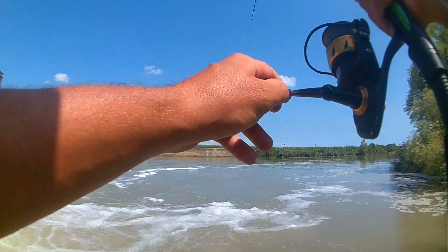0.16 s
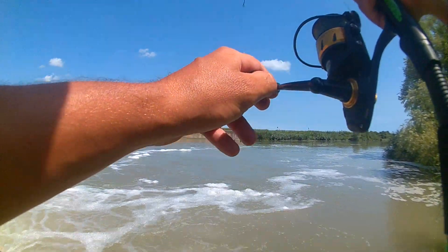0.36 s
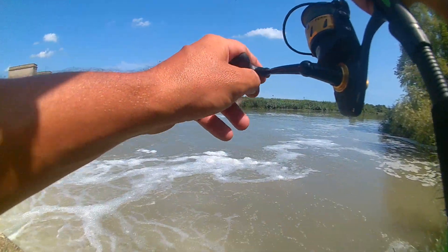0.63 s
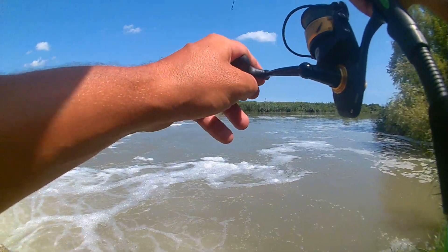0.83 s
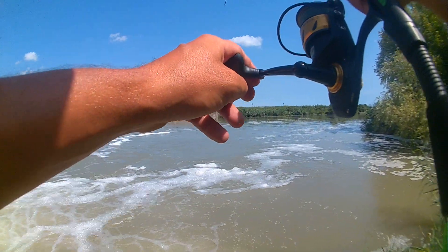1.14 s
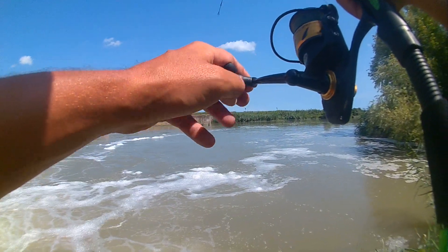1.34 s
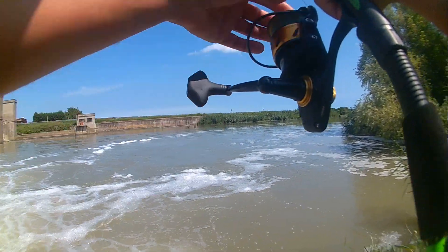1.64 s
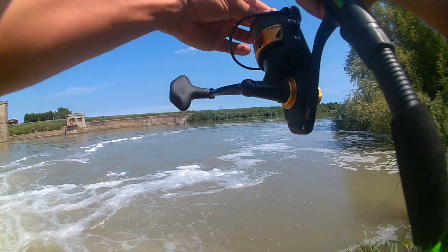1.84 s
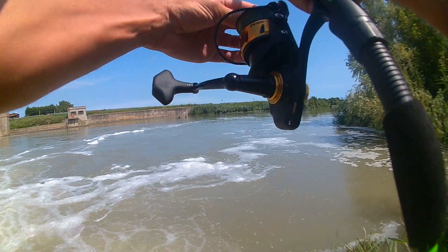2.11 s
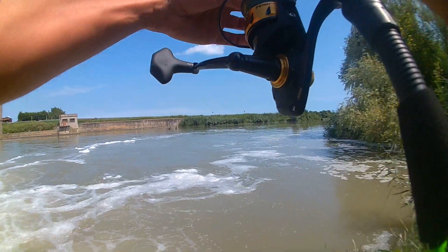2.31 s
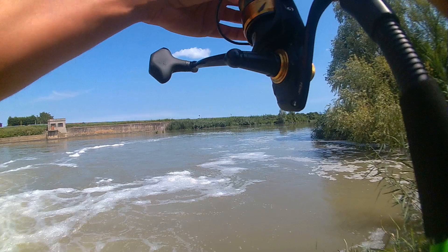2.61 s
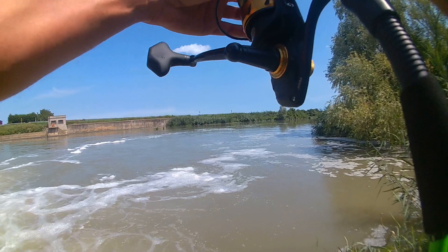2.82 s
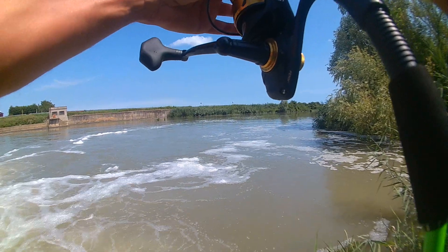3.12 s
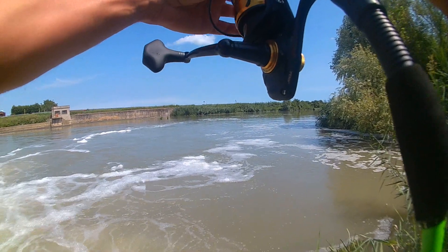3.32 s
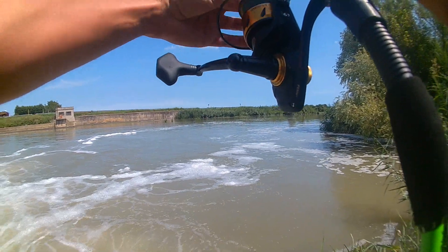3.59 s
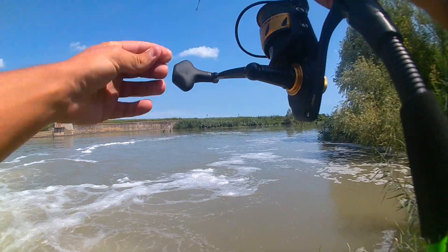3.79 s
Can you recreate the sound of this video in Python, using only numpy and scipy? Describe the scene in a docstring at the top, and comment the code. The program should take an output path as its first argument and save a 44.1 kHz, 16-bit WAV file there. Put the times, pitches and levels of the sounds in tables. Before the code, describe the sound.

A river churns below a weir throughout: a steady, mid-heavy, bubbling roar with slight swells, slightly stronger at the start. Very close, a fishing reel is handled outdoors: quick, uneven, hollow creaking ticks from about 0.7 to 1.95 seconds, only water until 2.35, then a sharp burst to 2.6, sparser ticks, and denser ones around 3.2-3.8. Faint gear whirr and line hiss accompany them, the ticks muffled by a closed camera case.

```python
"""A river churns below a weir: half-octave bands of noise make its broad roar, short rising rings its bubbles.
Close by, a fishing reel is handled in two spells. Its line sticks and slips in quick, uneven ticks that
ring the rod and a closed waterproof camera case, which muffles their treble; the sliding line hisses.
The gears whirr faintly, one ringing tick per tooth."""
import sys
import numpy as np
from scipy import signal
from scipy.fft import rfft, irfft, next_fast_len
from scipy.io import wavfile
from scipy.ndimage import uniform_filter1d

SR = 44100
rng = np.random.default_rng(int(sys.argv[2]) if len(sys.argv) > 2 else 0)


def bounce(signal):
    """Save signal as a 16-bit WAV file at the path given by the first command-line argument."""
    frames = np.transpose(np.atleast_2d(signal))
    limited = np.clip(frames, -1, 1)
    pcm = np.round(limited * 32767).astype(np.int16)
    wavfile.write(sys.argv[1], SR, pcm)


N = 174195

# Weir spectrum, relative: (frequency [Hz], density [dB per Hz])
ROAR_SPECTRUM = [(20, -71), (60, -42), (120, -29), (200, -18), (300, -8.5), (450, -1.5), (700, -3),
                 (980, 5.5), (1230, 2), (1450, -12), (1800, -29.5), (2500, -41.5), (4300, -67.5),
                 (5500, -84.5)]
# River swell: (time [s], low roar level [dB], upper rush level [dB])
RIVER_FLOW = [(0, -26.5, -28), (.17, -31, -26.5), (.32, -30, -29.5), (.48, -30.5, -26), (.64, -30, -28),
              (.8, -30.5, -27.5), (1.08, -30, -25), (1.24, -33, -27.5), (1.5, -31.5, -27),
              (1.69, -30.5, -28), (1.86, -31, -27.5), (2.2, -31.5, -30.5), (2.45, -32.5, -26.5),
              (2.58, -33.5, -30.5), (2.7, -31.5, -27), (2.85, -31.5, -29.5), (3.3, -30.5, -28.5),
              (3.6, -32, -26.5), (3.95, -31.5, -28.5)]
# Pull on the line: (time [s], creak level ahead of the case [dB], rub level ahead of RUB_GAIN_DB [dB])
LINE_LEVELS = [(0, -62, -78), (.28, -64, -79), (.38, -58, -69.5), (.57, -57, -76), (.72, -39, -58.5),
               (.82, -30, -65.5), (.98, -44, -70), (1.1, -47, -61), (1.24, -29.5, -57), (1.42, -41, -67.5),
               (1.7, -41.5, -64.5), (1.93, -51, -74.5), (2.01, -69, -80), (2.34, -68.5, -83),
               (2.39, -38, -65.5), (2.48, -32, -55.5), (2.64, -40, -66.5), (2.88, -54, -76.5),
               (3.08, -45, -70.5), (3.33, -48, -69), (3.46, -42, -72), (3.58, -41, -72.5), (3.66, -32, -64),
               (3.71, -42, -73), (3.78, -37.5, -65.5), (3.81, -54, -77), (3.95, -47.5, -73)]
# Resonances of rod and case, relative: (frequency [Hz], width [Hz], level [dB])
ROD_MODES = [(1170, 120, -12.5), (1310, 150, 12.5), (1580, 218, 24.5), (1798, 280, 6), (2540, 1000, -27),
             (3600, 1500, -32)]
# Single hard slips, ahead of the case: (time [s], level [dB])
HARD_SLIPS = [(.694, -27.5), (.707, -24), (.764, -31), (.785, -22.5), (.807, -22), (.819, -23),
              (0.837, -21.5), (0.844, -24), (0.854, -24.5), (0.87, -27), (.887, -26), (.899, -28),
              (.913, -24.5), (1.187, -27), (1.196, -23), (1.221, -27), (1.228, -23), (1.243, -21.5),
              (1.269, -27), (1.287, -26.5), (1.323, -31), (1.369, -27), (1.54, -28.5), (1.7551, -26.5),
              (1.807, -27.5), (1.8152, -26), (1.8326, -23), (1.866, -21.5), (1.9175, -24), (2.349, -24.5),
              (2.386, -30), (2.396, -23), (2.414, -30), (2.425, -25), (2.445, -23.5), (2.457, -30),
              (2.478, -24), (2.488, -28), (2.503, -25), (2.514, -25.5), (2.523, -28), (2.559, -27),
              (2.695, -32.5), (3.18, -30.5), (3.255, -29), (3.294, -28), (3.349, -26.5), (3.38, -24),
              (3.418, -28.5), (3.4338, -27), (3.454, -25), (3.4604, -24), (3.503, -24.5), (3.523, -24.5),
              (3.5361, -24.5), (3.562, -25), (3.606, -23), (3.63, -20.5), (3.66, -24.5), (3.667, -28),
              (3.683, -28.5), (3.7163, -26), (3.73, -30), (3.756, -24), (3.768, -30), (3.784, -29)]
# Hiss of the rubbing line, relative: (frequency [Hz], density [dB per Hz])
RUB_SPECTRUM = [(30, -79), (1200, -7.5), (1900, -1.5), (2350, -4), (2570, 2.5), (2800, -5), (3500, -17),
                (4300, -19), (5100, -51), (7000, -54), (7900, -32), (10500, -34.5), (12500, -40.5),
                (13500, -55), (15000, -56.5)]
# Resonances struck by each gear tooth, relative: (frequency [Hz], width [Hz], level [dB])
GEAR_MODES = [(1514, 176, 28.5), (2568, 89, 12.5), (3750, 200, -1.5), (4250, 380, -1), (7840, 550, -15.5),
              (8600, 690, -23.5), (9900, 520, -8), (11000, 700, -28.5), (12300, 600, -32.5)]
# Reel speed, below 0 taken as rest: (time [s], tooth rate [teeth/s])
REEL_SPEED = [(0, 54.5), (.18, 25.5), (.29, 0.5), (.32, 119.5), (.38, 235), (0.451, 204.5), (.5, 160),
              (.6, 112.5), (.72, 289.5), (0.871, 306), (1, 245.5), (1.24, 379), (1.53, 269), (1.62, 300),
              (1.73, 235), (1.82, 205.5), (1.901, 125.5), (1.971, 95), (2, -0.5), (2.34, -0.5),
              (2.48, 369.5), (2.62, 256), (2.73, 139.5), (2.84, 105.5), (2.909, 130.5), (2.99, 105),
              (3.069, 134.5), (3.149, 106), (3.231, 139), (3.32, 106.5), (3.39, 124.5), (3.47, 107.5),
              (3.66, 194), (3.78, 160), (3.95, 126)]

RUSH_ABOVE_HZ = 720  # splits low roar from upper rush
SURGE_RMS_DB, SURGE_PER_S = 0.31, 5.1  # all bands together
FLICKER_RMS_DB, FLICKER_PER_S = 0.2, 31  # each band alone

BUBBLES_PER_S, BUBBLE_LOW_HZ, BUBBLE_HIGH_HZ = 500, 307.3, 1353.5
BUBBLE_DB = -9  # relative to the upper rush
BUBBLE_CYCLES, BUBBLE_RISE = 18, 0.067  # cycles per 20 dB of decay; share of pitch gained in them
BUBBLE_SPREAD_DB = 3  # mean of the exponential spread

PEAK_SLIPS_PER_S = 215  # nominal, at the loudest creak
SLIP_RATE_DB_PER_DB = 0.4  # slip rate against creak level
SLIP_JITTER, SLIP_SPREAD_DB = 0.4, 1  # rms log interval; rms level
SLIP_DETUNE = 0.035  # share by which the ring shifts from slip to slip
SLIP_MODE_SCATTER_DB, SNAG_MODE_SCATTER_DB = 0.9, 1
CASE_HZ = 4500  # the case muffles the ticks above this

RUB_GAIN_DB, RUB_GRAIN_RMS_DB, RUB_GRAIN_PER_S = 4.5, 3.5, 110

TOOTH_BASE_DB, TOOTH_DB_PER_TOOTH_PER_S = -51.5, 0.0145  # teeth strike harder at speed
TOOTH_RATE_JITTER, TOOTH_SPREAD_DB, TOOTH_MODE_SCATTER_DB = 0.025, 1.5, 3
PINION_TEETH, PINION_DB, PINION_DETUNE = 8, 2.5, 0.015  # per turn: peak swing of level; share of pitch

TOP_HZ = 15500


def undb(db):
    """Decibels to gain."""
    return 10 ** (np.asarray(db) / 20)


def unit(x):
    """Scale to an rms of 1."""
    return x / np.sqrt(np.mean(x ** 2))


def curve(table, axis=1):
    """Gain at every sample from a dB column of a timed table."""
    rows = np.array(table)
    return undb(np.interp(np.arange(N) / SR, rows[:, 0], rows[:, axis]))


def colour(points, hz):
    """Gain of a spectrum table at hz, interpolated in dB over log frequency."""
    rows = np.array(points)
    return undb(np.interp(np.log(hz + 1), np.log(rows[:, 0]), rows[:, 1]))


def filtered(x, response):
    """Pass x through a response given as a function of frequency."""
    size = next_fast_len(N + SR // 10)
    hz = np.maximum(np.fft.rfftfreq(size, 1 / SR), 1)
    return irfft(rfft(x, size) * response(hz), size)[:N]


def walk(rate_per_s):
    """Smooth random drift of rms 1, varying about rate_per_s times a second."""
    width = max(int(SR / rate_per_s), 2)
    drift = uniform_filter1d(rng.standard_normal(N), width, mode="wrap")
    return unit(uniform_filter1d(drift, width // 2, mode="wrap"))


def roar(count=18):
    """White water: half-octave noise bands that surge together and flicker alone."""
    low, upper = np.zeros(N), np.zeros(N)
    for k in range(count):
        def band(hz):
            octaves = np.clip(2 * np.log2(hz / 20) - k, -1, 1)
            return np.cos(np.pi / 2 * octaves) * colour(ROAR_SPECTRUM, hz)

        water = filtered(rng.standard_normal(N), band)
        water = water * undb(FLICKER_RMS_DB * walk(FLICKER_PER_S))
        if 20 * 2 ** (k / 2) < RUSH_ABOVE_HZ:
            low += water
        else:
            upper += water
    both = unit(low) * curve(RIVER_FLOW, axis=1) + unit(upper) * curve(RIVER_FLOW, axis=2)
    return both * undb(SURGE_RMS_DB * walk(SURGE_PER_S))


def bubbles():
    """Crowds of bubbles, each a decaying sine of rising pitch, swelling with the upper rush."""
    out = np.zeros(N + SR)
    for when, pitch, size in rng.random((int(BUBBLES_PER_S * N / SR), 3)):
        hz = BUBBLE_LOW_HZ * (BUBBLE_HIGH_HZ / BUBBLE_LOW_HZ) ** pitch
        cycles = np.arange(int(2 * BUBBLE_CYCLES * SR / hz)) * hz / SR
        age = cycles / BUBBLE_CYCLES
        tone = np.sin(2 * np.pi * cycles * (1 + BUBBLE_RISE * age / 2)) * 10 ** -age
        gain = undb(-BUBBLE_SPREAD_DB * np.log(max(1 - size, .02)))
        start = int(when * N)
        out[start:start + len(tone)] += tone * gain
    crowd = unit(filtered(out[:N], lambda hz: colour(ROAR_SPECTRUM, hz)))
    return crowd * undb(BUBBLE_DB) * curve(RIVER_FLOW, axis=2)


def ring(times_s, gains, modes, scatter_db, detune, size=1024):
    """Each push rings squared resonances, with a slightly different balance and pitch every time."""
    chance = rng.uniform(-0.86, 1, (len(times_s), len(modes))) * np.sqrt(3)
    f = np.maximum(np.fft.rfftfreq(size, 1 / SR), 1) / (1 + detune[:, None])
    spectra = 0
    for k, (hz, width, db) in enumerate(modes):
        resonance = 1 / (1 + 1j * (f * f - hz * hz) / (f * width)) ** 2
        sign = (-1) ** k  # neighbouring modes in opposite phase
        spectra = spectra + sign * undb(db + scatter_db * chance[:, k, None]) * resonance
    ticks = gains[:, None] * irfft(spectra, size)
    out = np.zeros(N + size)
    for start, tick in zip((times_s * SR).astype(int), ticks):
        out[start:start + size] += tick
    return out[:N] * SR / (2 * sum(width * undb(db) for hz, width, db in modes))


def creak():
    """Stick-slip of the line: an uneven tick train, quicker when pulled harder."""
    loud = curve(LINE_LEVELS, axis=1)
    rate = PEAK_SLIPS_PER_S * (loud / loud.max()) ** SLIP_RATE_DB_PER_DB
    progress = np.cumsum(rate) / SR
    chance = rng.uniform(-1, 1, (N // 100, 3)) * np.sqrt(3)
    marks = np.cumsum(np.exp(SLIP_JITTER * chance[:, 0]))
    at = np.searchsorted(progress, marks[marks < progress[-1]])
    chance = chance[:len(at)]
    gains = undb(SLIP_SPREAD_DB * chance[:, 1]) / np.sqrt(rate[at])  # even power at any rate
    train = ring(at / SR, gains, ROD_MODES, SLIP_MODE_SCATTER_DB, SLIP_DETUNE * chance[:, 2])
    return unit(train) * loud


def snags():
    """Harder slips of the line ring the same modes as single ticks."""
    times_s, db = np.array(HARD_SLIPS).T
    detune = SLIP_DETUNE * rng.uniform(-1.3, 1, len(times_s))
    return ring(times_s, undb(db), ROD_MODES, SNAG_MODE_SCATTER_DB, detune)


def case(ticks):
    """The closed case muffles the line's ticks: a steep lowpass."""
    return signal.sosfilt(signal.butter(12, CASE_HZ, fs=SR, output="sos"), ticks)


def rub():
    """Sliding friction of the line: a faint hiss of noise with a grainy level."""
    grain = rng.standard_normal(N) * undb(RUB_GRAIN_RMS_DB * walk(RUB_GRAIN_PER_S))
    hiss = unit(filtered(grain, lambda hz: colour(RUB_SPECTRUM, hz)))
    return hiss * curve(LINE_LEVELS, axis=2) * undb(RUB_GAIN_DB)


def gears():
    """One tick per tooth, harder at speed; the mesh tightens once per pinion turn: louder and higher."""
    rate = np.maximum(np.interp(np.arange(N) / SR, *np.array(REEL_SPEED).T), 0)
    rate = rate * np.exp(TOOTH_RATE_JITTER * walk(100))
    at = np.flatnonzero(np.diff(np.floor(np.cumsum(rate) / SR)))
    mesh = np.sin(2 * np.pi * np.arange(len(at)) / PINION_TEETH)
    db = TOOTH_BASE_DB + TOOTH_DB_PER_TOOTH_PER_S * rate[at] + PINION_DB * mesh
    db = db + TOOTH_SPREAD_DB * rng.standard_normal(len(at))
    return ring(at / SR, undb(db), GEAR_MODES, TOOTH_MODE_SCATTER_DB, PINION_DETUNE * mesh)


def scene():
    """The river ahead and the reel beside the microphone, in mono."""
    river = roar() + bubbles()
    reel = case(snags() + creak()) + rub() + gears()
    return (river + reel)[None]


def record(dry):
    """The recorder cuts the top: a steep elliptic lowpass."""
    return signal.sosfilt(signal.ellip(8, .2, 70, TOP_HZ, fs=SR, output="sos"), dry)


dry = scene()
out = record(dry)
bounce(out)
```